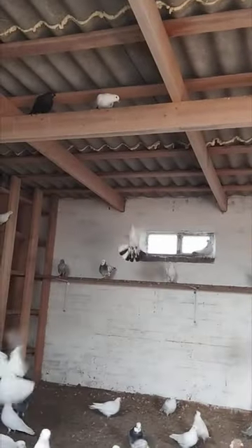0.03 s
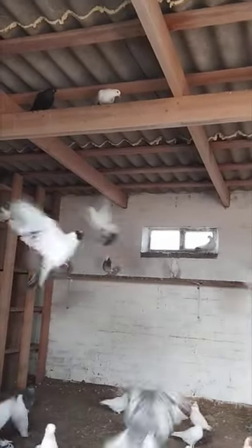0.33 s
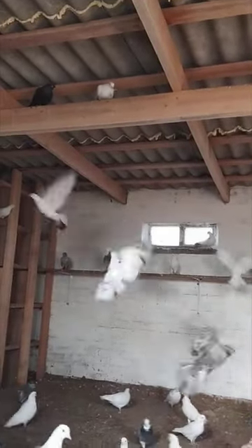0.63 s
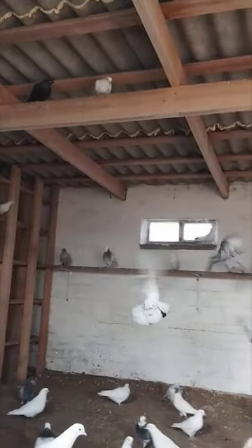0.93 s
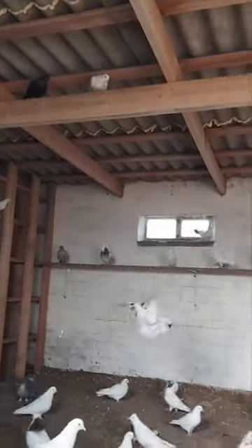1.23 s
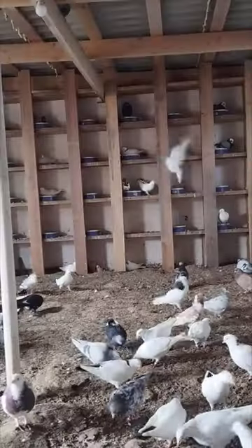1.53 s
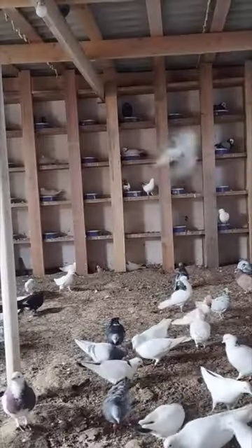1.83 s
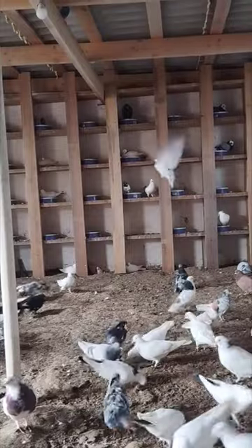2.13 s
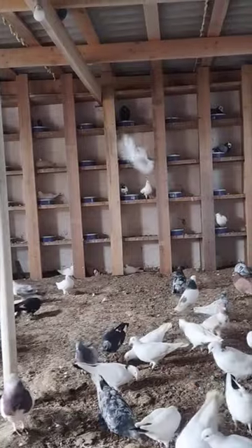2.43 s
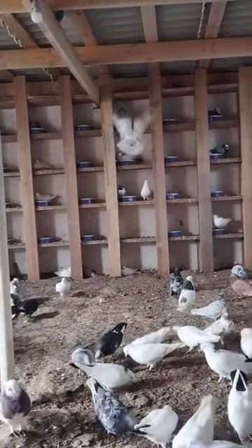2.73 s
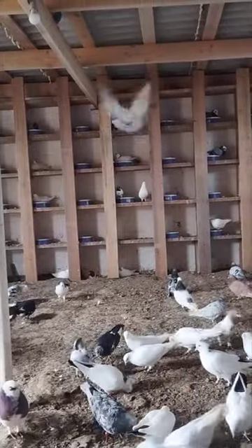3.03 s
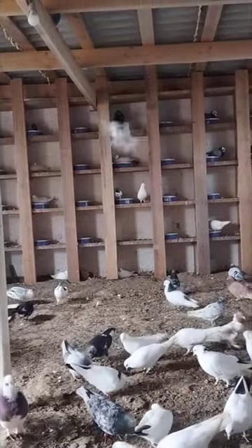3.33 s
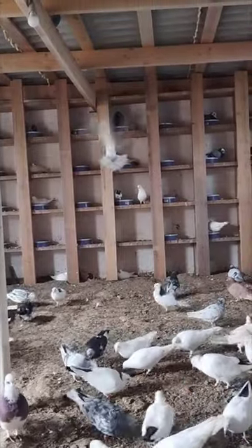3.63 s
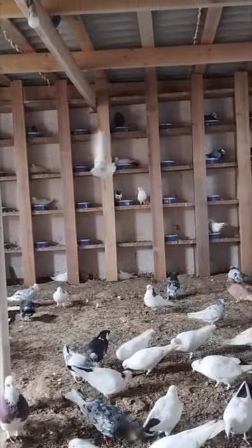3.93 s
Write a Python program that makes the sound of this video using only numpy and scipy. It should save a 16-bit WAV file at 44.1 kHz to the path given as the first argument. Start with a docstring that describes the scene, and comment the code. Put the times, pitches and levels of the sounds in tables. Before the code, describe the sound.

Pigeons flap inside a wooden loft, with swishes and close feather flicks from the start and sharp wing claps around 0.7 and 1 second. The sound drops out briefly near 1.4 seconds, then near and distant cooing comes back louder. More claps cluster between 1.5 and 2.2 seconds, and others follow at 3.3 and 3.9. Rustling plumage, ticking feet and a low building rumble continue underneath.

```python
"""A flock of pigeons, heard from inside their wooden loft on a stereo pair of microphones.
Flying birds, mostly to the right, clap their wings and swish through the air; feathers flick
close by, and all around plumage rustles and feet tick. A few near birds coo over a farther
chorus and the low rumble of the building. The sound breaks off for an instant;
after the break the cooing is louder."""
import sys
import numpy as np
from scipy import signal
from scipy.fft import rfft, irfft
from scipy.io import wavfile
from scipy.ndimage import uniform_filter1d

SR = 44100
rng = np.random.default_rng(int(sys.argv[2]) if len(sys.argv) > 2 else 0)


def output_pcm(signal):
    """Save a mono or channel-first signal as 16-bit PCM at the path in sys.argv[1].

    Samples are clipped to [-1, 1] before scaling.
    """
    pcm = np.clip(np.atleast_2d(signal).T, -1, 1) * 32767
    wavfile.write(sys.argv[1], SR, np.round(pcm).astype(np.int16))


N = 176400
T = np.arange(N) / SR
HZ = np.maximum(np.arange(N + 1) * SR / (2 * N), 1)

# wing claps: start_s, level_db, tilt_db_per_octave, left_over_right_db, ring_hz, ring_db, room_send_db
CLAPS = [(0.6844, -13.5, -1, 2.5, 5100, 5.5, -3), (0.9562, -19.5, 1, 3, 3250, 3.5, 0.5),
         (1.494, -23, -1.5, 0.5, 2200, 5.5, 3), (1.846, -21, -1, -2, 3100, 6.5, 1),
         (1.9887, -14, -2, -1, 2920, 2.5, 1.5), (2.146, -13.5, -2, -2, 3520, 3, -3),
         (2.7515, -35.5, -3, 0.5, 7700, 4, 2), (3.3268, -23.5, -1.5, -0.5, 1140, 12, 1),
         (3.868, -14, 0, 4, 3600, 3.5, -5.5)]
# spectrum of claps and flicks: frequency_hz, level_db
CLAP_SPECTRUM = [(100, -9), (350, -5.5), (800, -1.5), (1300, -0.5), (2100, 1.5), (3300, -1.5), (4600, -1.5),
                 (6000, 3), (8000, -3.5), (12000, -4.5)]
# wing strokes through the air: start_s, length_s, level_db, tilt_db_per_octave
STROKES = [(0.1, 0.087, -40.5, 4), (0.327, 0.041, -32.5, 1), (0.396, 0.033, -33.5, 2),
           (0.538, 0.037, -36, 5), (0.799, 0.013, -35.5, 3), (1.159, 0.065, -31.5, 2),
           (1.412, 0.047, -33, 0.5), (1.682, 0.018, -32, 3), (1.807, 0.024, -33, 3),
           (1.87, 0.073, -33, 1.5), (1.981, 0.0055, -22, 1.5), (2.362, .04, -38, 2),
           (2.475, 0.04, -38.5, 1), (2.607, 0.048, -45.5, 3.5), (2.888, 0.045, -43, -0.5),
           (3.018, 0.027, -40.5, -1), (3.159, 0.033, -42, -1), (3.508, 0.025, -36.5, 0.5),
           (3.629, 0.063, -37, 1), (3.75, 0.027, -36, 0.5), (3.811, 0.02, -34, 2)]
# spectrum of rubbing feathers: frequency_hz, level_db
FEATHER_SPECTRUM = [(100, 0), (350, 13), (750, 6), (1200, 4), (2200, 2), (3300, -1), (4600, -7), (6200, -5),
                    (8000, -9), (12000, -7)]
# flight feathers whirring on some strokes: centre_s, level_db, tilt_db_per_octave
WHIRRS = [(.42, -45.5, -13), (1.885, -42.5, 7), (3.682, -39, -2.5)]
# feather flicks close by: start_s, level_db
FLICKS = [(0.0812, -26), (.1231, -27), (0.2422, -26), (0.325, -24.5), (0.5816, -22), (0.7969, -24.5),
          (0.8817, -25.5), (1.1611, -21), (1.178, -20), (2.618, -36)]
# near coos: start_s, length_s, first_pitch_hz, last_pitch_hz, level_db, roughness (0 is pure)
NEAR_COOS = [(0.332, 0.051, 391.6, 401, -26.5, 0.4), (0.545, 0.048, 330, 310, -32, 1.18),
             (0.575, 0.14, 341.5, 347, -32, 0.07), (1.417, 0.051, 337.7, 303, -25, 0.8),
             (1.552, .12, 438.7, 424.7, -34.5, 0.22), (1.535, 0.13, 266.6, 204.6, -36, 0.2),
             (1.665, 0.03, 270, 276, -35, 0.26), (1.923, 0.13, 288, 310.4, -33.5, 0.42),
             (2.25, 0.13, 431.3, 436.7, -32, 0.7), (2.251, 0.11, 295, 293, -32, 0.02),
             (2.371, 0.039, 306, 289, -26.5, .45), (2.418, 0.13, 310.6, 290.4, -35, 0.47),
             (2.396, 0.17, 227.6, 229.8, -30.5, 0.13), (2.56, 0.098, 400.4, 278.4, -35.5, 0.13),
             (2.674, 0.1, 270.7, 274.3, -34.5, 0.04), (3.022, 0.11, 265.6, 200.5, -34, 0.07),
             (3.221, 0.073, 248.4, 248, -35, 0.3), (3.35, 0.278, 221.7, 214.2, -40.5, 0.71),
             (3.558, 0.12, 316.9, 335.6, -32.5, 0.48), (3.766, 0.043, 332, 320, -29, 0.3),
             (3.828, 0.055, 307, 313, -27.5, 0.3), (3.89, 0.091, 332, 324, -31.5, 0.44)]
# cooing farther off: time_s, level_db
CHORUS_LEVEL = [(0, -51), (.6, -38.5), (1.33, -45), (1.45, -27.5), (1.85, -37.5), (2.4, -31.5), (2.7, -35),
                (3.45, -33.5), (4, -28.5)]
# the flock's rustling: time_s, level_db
RUSTLE_LEVEL = [(0, -38), (.5, -35.5), (.9, -38), (1.33, -36), (1.62, -39.5), (1.9, -38), (2.2, -34.5),
                (2.45, -44), (2.7, -49.5), (2.95, -44), (3.25, -47), (3.45, -43), (3.7, -37.5), (4, -43)]
# rumble of the building: time_s, level_db
RUMBLE_LEVEL = [(0, -41), (.15, -35.5), (.9, -38.5), (2.15, -39.5), (2.7, -46), (3.15, -43), (3.35, -42.5),
                (4, -39.5)]
# spectrum of the rumble: frequency_hz, level_db
RUMBLE_SPECTRUM = [(20, -7), (48, -2.5), (68, 0), (100, -7.5), (150, -9), (250, -14.5), (600, -12.5),
                   (1200, -31), (4000, -39)]
# deep drone: time_s, level_db
DRONE_LEVEL = [(0, -37), (.55, -33.5), (1.5, -36.5), (3.0, -43), (4, -41)]
# resonances of the loft: frequency_hz
LOFT_MODES = [1860, 2124, 3070, 3270, 3655, 3770]
# likeness of diffuse sound at the two microphones: frequency_hz, correlation (capped at 0.99 in use)
MIC_LIKENESS = [(30, 0.7), (130, 1.3), (300, 0.78), (550, 0.5), (1000, -0.05), (12000, -0.06)]
# stereo balance: frequency_hz, left_over_right_db
BALANCE = [(30, 0), (350, 1), (700, 1), (1400, -4.5), (2800, -5.5), (5500, -2), (8000, -2), (12000, 5.5)]
# microphone response: frequency_hz, gain_db
MIC_RESPONSE = [(20, -0.5), (7800, -2), (8900, -7.5), (9700, -36), (10800, -13.5), (12300, -20.5),
                (14000, -37)]

LOFT_T60_S, LOFT_BASS_T60_S = 0.3, 0.5
FLICK_T60_S, GRAIN_DB, WING_RING_OCTAVES = 0.024, 3.5, 0.2
BREAK_S, RESUME_S = 1.351, 1.396


def wing_claps(snap_t60_s=0.0058, slap_delay_s=0.0018, tail_t60_s=0.059):
    """The wings meet over the back: a crack and a second slap just behind it, ringing in the feathers."""
    direct, sent, t = np.zeros((2, N)), np.zeros((2, N)), T[:4096]
    snap = from_db(-60 * t / snap_t60_s)
    slap = (t > slap_delay_s) * from_db(1 - 60 * (t - slap_delay_s) / snap_t60_s)
    crack = snap + slap + from_db(-10 - 60 * t / tail_t60_s)
    hz = np.maximum(np.arange(len(t) // 2 + 1) * SR / len(t), 1)
    for start_s, db, tilt_db, pan_db, ring_hz, ring_db, send_db in CLAPS:
        resonance = from_db(ring_db * bell(hz, ring_hz, WING_RING_OCTAVES))
        ringing = irfft(rfft(feather_noise(tilt_db, len(t))) * resonance)
        strength = np.sqrt(np.mean(crack ** 2) * np.mean(ringing ** 2))  # same energy whatever the grain
        burst = strength * np.array([unit_rms(side * crack) for side in ringing])
        clap = burst * from_db([[db + pan_db / 2], [db - pan_db / 2]])
        add(direct, start_s, clap)
        add(sent, start_s, clap * from_db(send_db))
    echoes = loft(sent, room_db=1.5) - sent
    return colour(direct + echoes, CLAP_SPECTRUM)


def wing_strokes(rise_s=0.0055, fall_s=0.02):
    """Air rushes through the flight feathers on each downstroke."""
    out, t = np.zeros((2, N)), T[:8192]
    for start_s, length_s, db, tilt_db in STROKES:
        swell = ramp(t / rise_s) * ramp((length_s - t) / fall_s + .5)
        add(out, start_s, feather_noise(tilt_db, len(t)) * swell * from_db(db))
    return loft(colour(out, FEATHER_SPECTRUM), room_db=-5.5)


def feather_whirrs(pitch_hz=784, jitter=0.038, ring_hz=2880, width_s=0.013):
    """A flight feather flutters in the airstream: a brief scratchy buzz that rings in the vane."""
    out, t, harmonic = np.zeros(N), T[:8192] - T[4096], np.arange(1, 6)[:, None]
    ring_db = 2.5 * bell(harmonic * pitch_hz, ring_hz, WING_RING_OCTAVES)
    swell = np.exp(-.5 * (t / width_s) ** 2)
    for centre_s, db, tilt_db in WHIRRS:
        phase = 2 * np.pi * np.cumsum(pitch_hz * (1 + jitter * drift(895, len(t)))) / SR
        partials = from_db(tilt_db * np.log2(harmonic) + ring_db) * np.sin(harmonic * phase)
        buzz = partials.sum(axis=0) * from_db(GRAIN_DB * drift(312, len(t)))
        add(out, centre_s + t[0], from_db(db) * unit_rms(buzz) * swell)
    return loft(out, room_db=1.5)


def feather_flicks(thump_hz=72.7, thump_db=-9):
    """Short snaps of feathers near the microphones, each with a soft thump of air pushed by the wing."""
    snaps, air, t = np.zeros((2, N)), np.zeros(N), T[:2048]
    thump = np.sin(2 * np.pi * thump_hz * t) * np.sin(np.pi * t / t[-1]) ** 2
    for start_s, db in FLICKS:
        add(snaps, start_s, feather_noise(0, len(t)) * from_db(db - 60 * t / FLICK_T60_S))
        add(air, start_s, thump * from_db(db + thump_db))
    return air + loft(colour(snaps, CLAP_SPECTRUM), room_db=-0.5)


def feather_sizzle():
    """The bright hiss of feathers passing close to the microphones, up to the break."""
    hiss = filtered(rng.standard_normal((2, N)), bell(HZ, centre_hz=4920, octaves=0.33))
    return unit_rms(hiss) * from_db(-47 + GRAIN_DB * drift(120, N)) * (T < BREAK_S)


def feather_noise(tilt_db, size):
    """Grainy stereo noise of vanes rubbing, tilted by tilt_db per octave about 3 kHz."""
    grains = rng.standard_normal((2, size)) * from_db(GRAIN_DB * drift(895, size))
    octaves = np.log2(np.clip(np.arange(size // 2 + 1) * SR / size, 500, 8000) / 3000)
    return irfft(rfft(unit_rms(grains)) * from_db(tilt_db * octaves))


def coo(length_s, first_hz, last_hz, roughness, roll_hz=28, attack_s=0.01, release_s=0.02):
    """A nearly pure gliding note from a closed beak; a rough one rolls, and its pitch arches and wanders."""
    t = T[:int((length_s + release_s / 2) * SR)]
    arch = np.sin(np.pi * t / t[-1]) - 2 / np.pi
    bend = 0.039 * arch + 0.151 * drift(149.9, len(t))
    pitch_hz = np.interp(t, [0, length_s], [first_hz, last_hz]) * (1 + roughness * bend)
    phase = running_phase(pitch_hz)
    voice = np.sin(phase) + from_db(-25) * np.sin(2 * phase) + from_db(-36) * np.sin(3 * phase)
    roll = 1 + roughness * np.sin(running_phase(roll_hz * (1 + 0.24 * drift(24.9, len(t)))))
    sag = from_db(-2 * arch)
    return unit_rms(voice * roll * sag) * ramp(t / attack_s) * ramp((t[-1] - t) / release_s)


def cooing(far_per_s=55, low_hz=210.54, high_hz=449.7, mean_length_s=0.16):
    """A few near birds over a chorus of farther, rougher ones, low and high voices in turn."""
    near, far = np.zeros(N), np.zeros(N)
    for start_s, length_s, first_hz, last_hz, db, roughness in NEAR_COOS:
        add(near, start_s, from_db(db) * coo(length_s, first_hz, last_hz, roughness))
    draws = rng.random((int(far_per_s * N / SR), 5))
    for k, (delay, length, pitch, glide, rough) in enumerate(draws):
        hz = low_hz + (high_hz - low_hz) * (k * 2 % 5 + pitch) / 5  # hops among five registers
        slide = 0.15 * (.5 - glide)
        note = coo(mean_length_s * (.5 + length), hz * (1 + slide), hz * (1 - slide), .45 + .55 * rough)
        add(far, (k + delay) / far_per_s - mean_length_s / 2, note)
    near = loft(near, room_db=-4.5, t60_s=LOFT_BASS_T60_S)
    far = loft(far, room_db=6, t60_s=LOFT_BASS_T60_S)
    return near + level(CHORUS_LEVEL) * unit_rms(far)


def flock_rustle(ticks_per_s=100, tick_db=-11.5, flutter_db=2.5):
    """Birds shuffle all around the microphones: a fluttering hiss with ticks of feet and beaks."""
    hiss = rng.standard_normal((2, N)) * from_db(flutter_db * drift(40, N))
    taps = (rng.random(N) < ticks_per_s / SR) * from_db(1.04 * np.minimum(rng.exponential(1, N), 3))
    decays = signal.lfilter([1], [1, -from_db(-60 / (FLICK_T60_S * SR))], taps + 1e-18)
    ticks = from_db(tick_db) * unit_rms(decays * rng.standard_normal((2, N)))
    return level(RUSTLE_LEVEL) * diffuse(colour(hiss + ticks, FEATHER_SPECTRUM))


def building_rumble():
    """The low, dull background of the building, with a deep wavering drone."""
    deep = filtered(rng.standard_normal(N), bell(HZ, centre_hz=34.2, octaves=0.18))
    drone = level(DRONE_LEVEL) * deep / np.sqrt(uniform_filter1d(deep ** 2, size=14000))
    rumble = diffuse(colour(rng.standard_normal((2, N)), RUMBLE_SPECTRUM))
    return drone + level(RUMBLE_LEVEL) * rumble


def loft(x, room_db, t60_s=LOFT_T60_S, early_t60_s=0.12, first_echo_s=0.0043, mode_width_hz=56):
    """Direct sound plus dense early echoes off the boards and a longer tail, in which a few modes ring."""
    decay = (from_db(-60 * T / t60_s) + from_db(-3 - 60 * T / early_t60_s)) * (T > first_echo_s)
    echoes = diffuse(rng.standard_normal((2, N))) * decay / np.sqrt(np.sum(decay ** 2))
    peaks = sum(1 / (1 + 2j * (HZ - hz) / mode_width_hz) for hz in LOFT_MODES)
    modes = 1 + (from_db(6) - 1) * peaks
    return x + from_db(room_db) * filtered(x, rfft(echoes, 2 * N) * modes)


def diffuse(pair):
    """Two unrelated signals as a diffuse field at the microphones: alike in the bass only."""
    alike = np.clip(at_hz(MIC_LIKENESS), -.99, .99)
    mid = filtered(pair[0], np.sqrt((1 + alike) / 2))
    side = filtered(pair[1], np.sqrt((1 - alike) / 2))
    return np.array([mid + side, mid - side])


def from_db(db):
    """Decibels to gain."""
    return 10 ** (np.asarray(db) / 20)


def unit_rms(x):
    """Scale to unit power."""
    return x / np.sqrt(np.mean(x ** 2) + 1e-20)


def ramp(x):
    """A linear fade, held between 0 and 1."""
    return np.clip(x, 0, 1)


def level(rows):
    """Gain along a level curve."""
    return from_db(np.interp(T, *np.transpose(rows)))


def at_hz(points):
    """A spectrum table on the frequency grid."""
    hz, value = np.transpose(points)
    return np.interp(np.log(HZ), np.log(hz), value)


def bell(hz, centre_hz, octaves):
    """A bell curve on the pitch axis, 1 on top."""
    return np.exp(-.5 * (np.log2(hz / centre_hz) / octaves) ** 2)


def filtered(x, gain):
    """Filter by a gain per frequency."""
    return irfft(rfft(x, 2 * N) * gain)[..., :N]


def colour(x, points):
    """Give white sound a spectrum and keep its power."""
    return filtered(x, unit_rms(from_db(at_hz(points))))


def drift(rate_hz, size):
    """A random wander around zero, with a spread of about 1."""
    return np.interp(np.arange(size) / SR * rate_hz, np.arange(1024), rng.standard_normal(1024))


def running_phase(hz):
    """Phase of a changing frequency, from a random start."""
    return 2 * np.pi * (np.cumsum(hz) / SR + rng.random())


def add(out, start_s, x):
    """Mix a sound in at a time."""
    i = max(int(start_s * SR), 0)
    out[..., i:i + x.shape[-1]] += x[..., :max(N - i, 0)]


def scene():
    """The flock from inside the loft; the balance puts the wings mostly to the right."""
    mix = building_rumble() + flock_rustle() + feather_sizzle()
    mix = mix + wing_claps() + wing_strokes() + feather_whirrs() + feather_flicks() + cooing()
    return filtered(mix, from_db(at_hz(BALANCE) * np.array([[.5], [-.5]])))


def record(dry, fade_out_s=0.0032, fade_in_s=0.025, break_db=-48, stopband_hz=15500):
    """Dull microphones, a short break in the sound, and a cut top."""
    running = ramp((BREAK_S - T) / fade_out_s) + ramp((T - RESUME_S) / fade_in_s)
    heard = filtered(dry, from_db(at_hz(MIC_RESPONSE))) * np.maximum(running, from_db(break_db))
    return signal.sosfilt(signal.cheby2(12, 70, stopband_hz, fs=SR, output="sos"), heard)


dry = scene()
out = record(dry)
output_pcm(out)
```